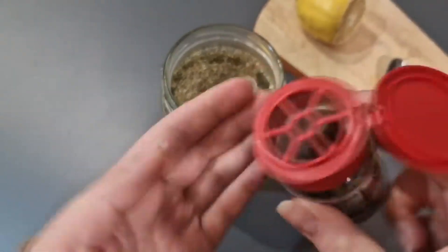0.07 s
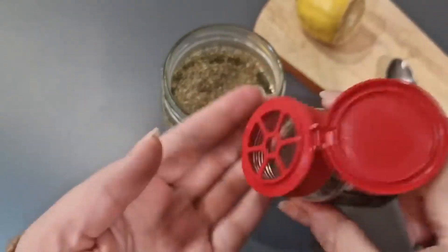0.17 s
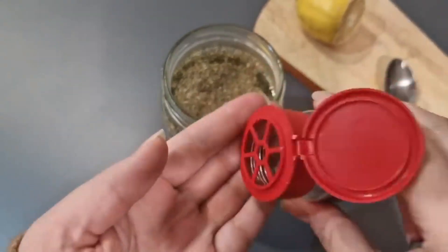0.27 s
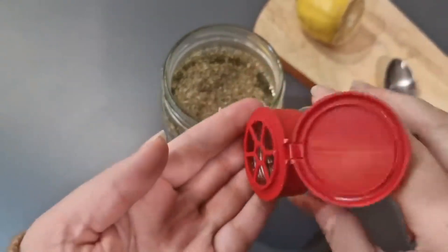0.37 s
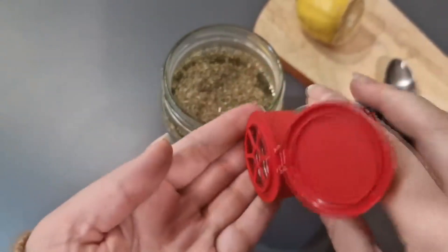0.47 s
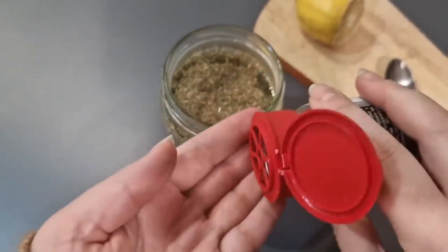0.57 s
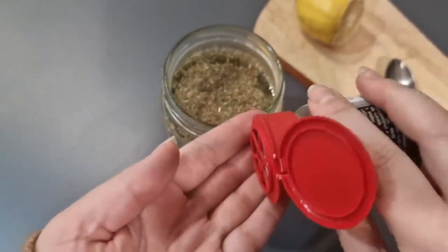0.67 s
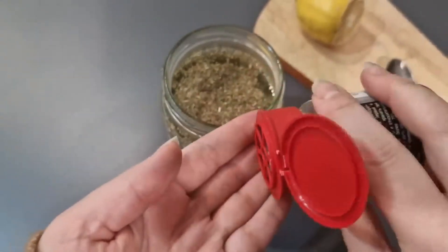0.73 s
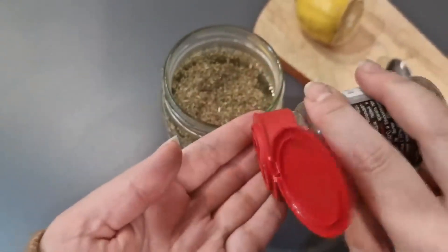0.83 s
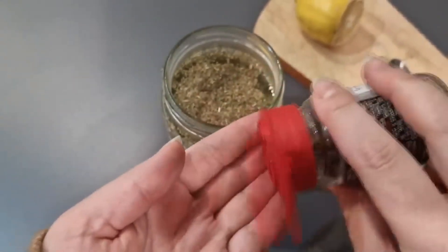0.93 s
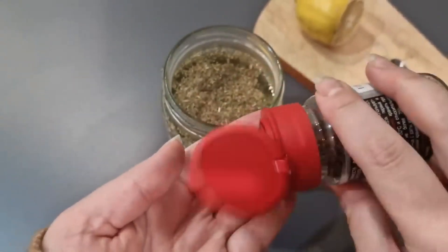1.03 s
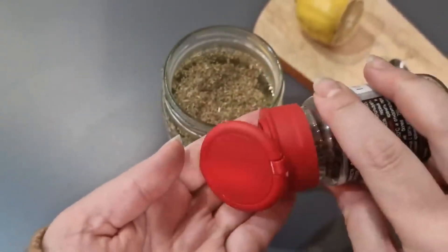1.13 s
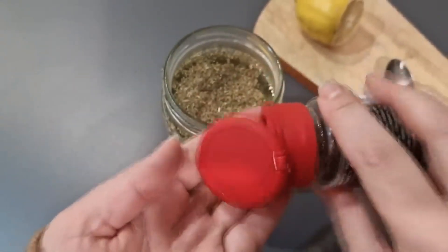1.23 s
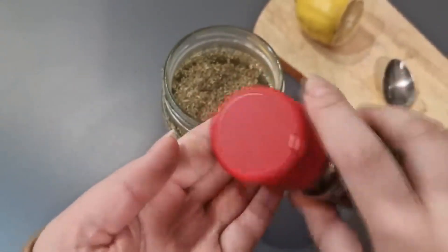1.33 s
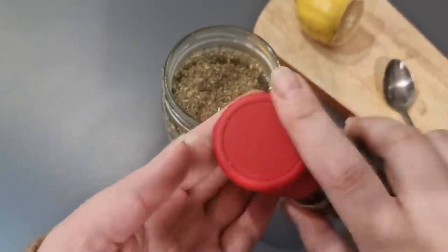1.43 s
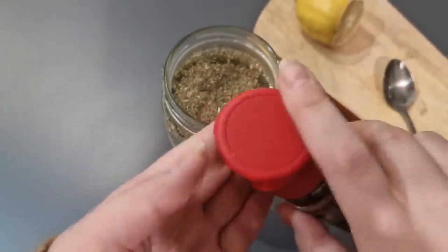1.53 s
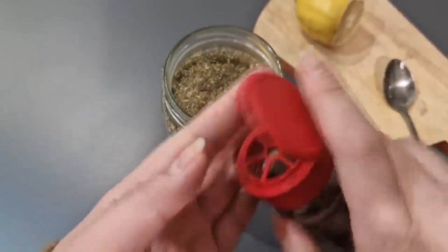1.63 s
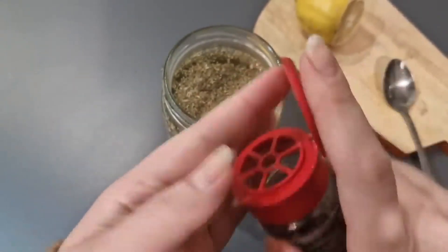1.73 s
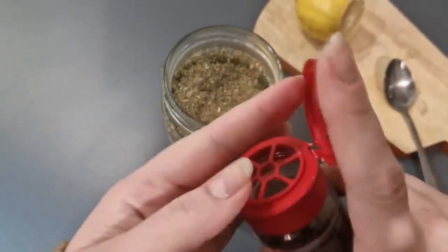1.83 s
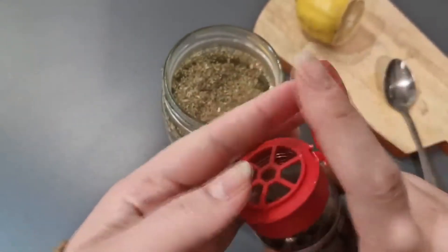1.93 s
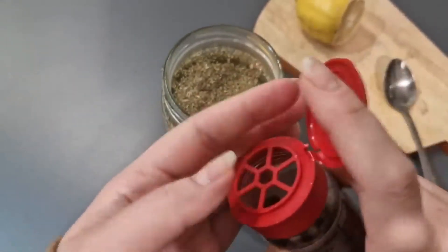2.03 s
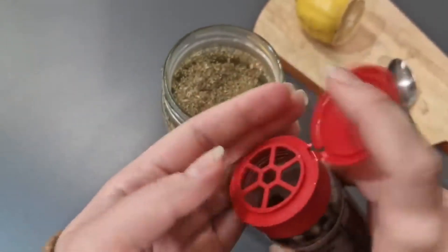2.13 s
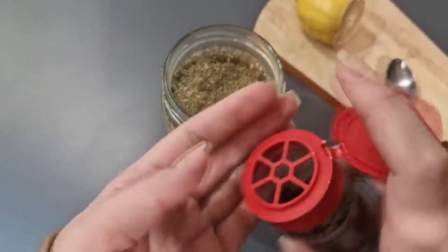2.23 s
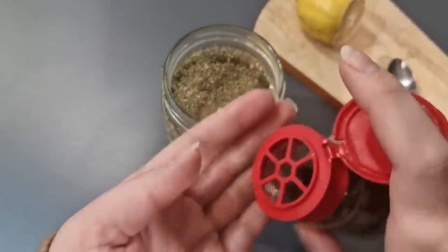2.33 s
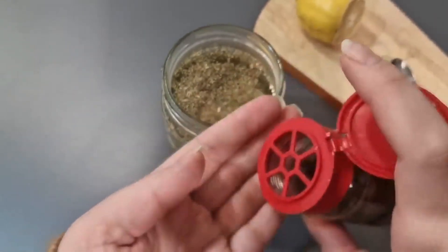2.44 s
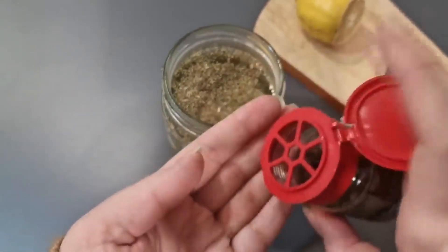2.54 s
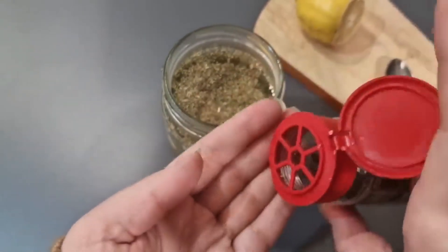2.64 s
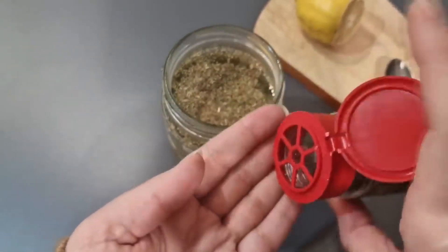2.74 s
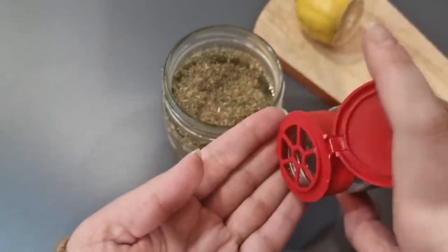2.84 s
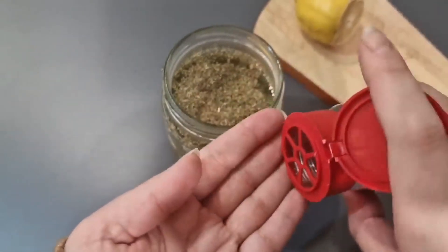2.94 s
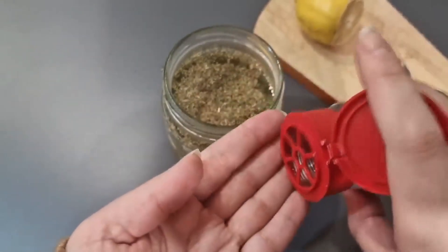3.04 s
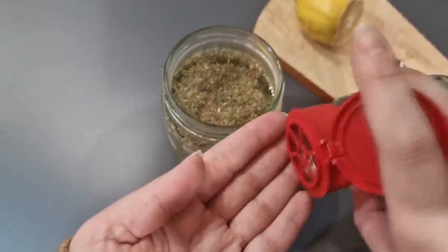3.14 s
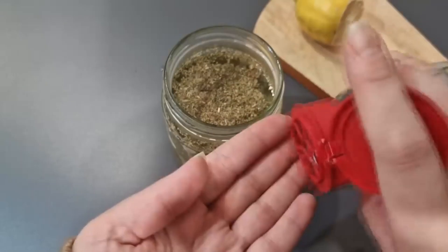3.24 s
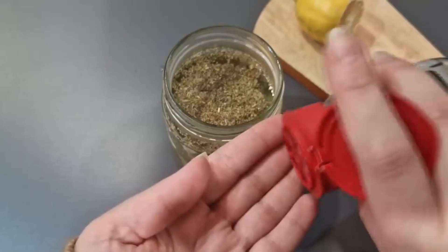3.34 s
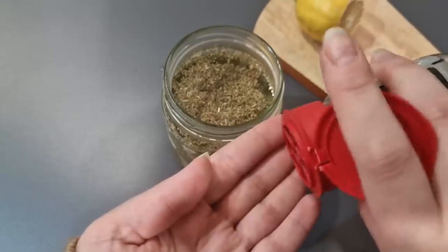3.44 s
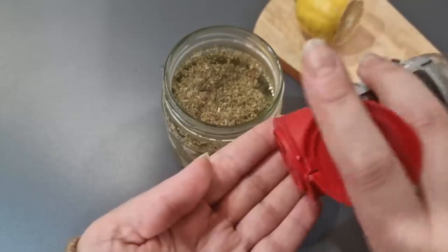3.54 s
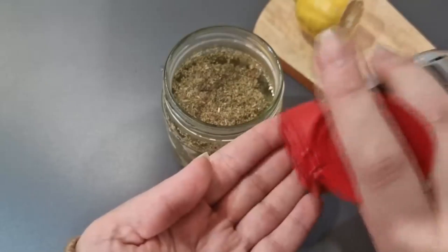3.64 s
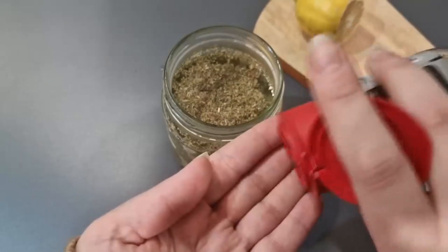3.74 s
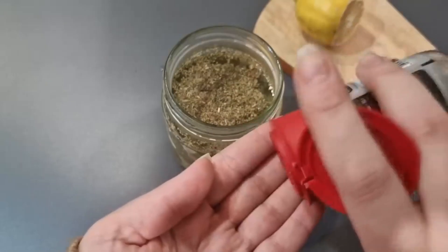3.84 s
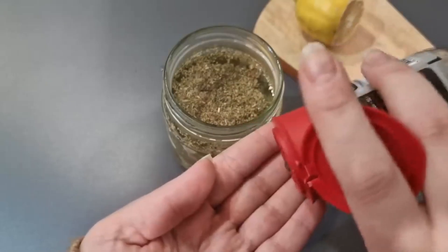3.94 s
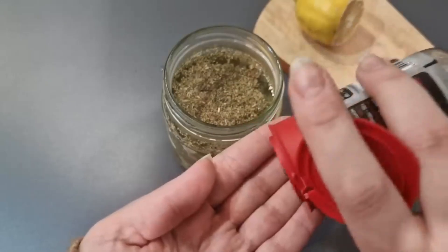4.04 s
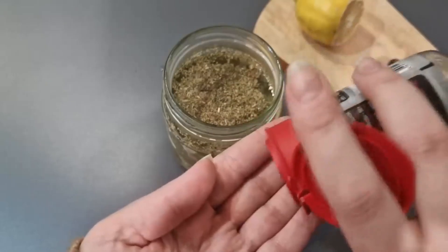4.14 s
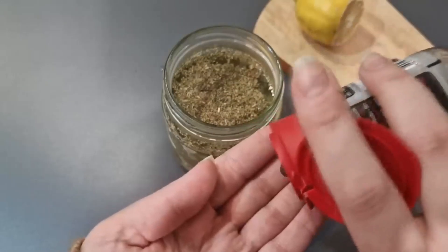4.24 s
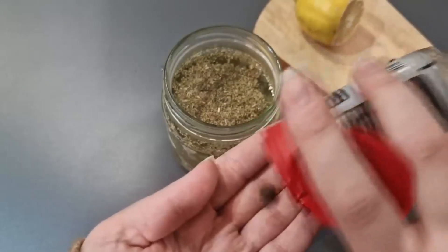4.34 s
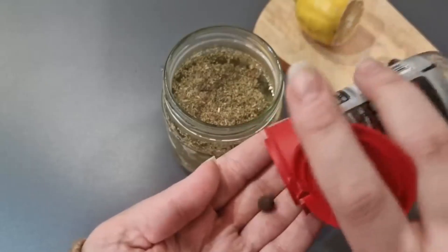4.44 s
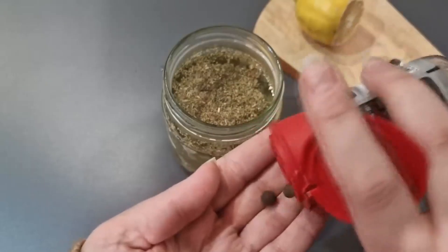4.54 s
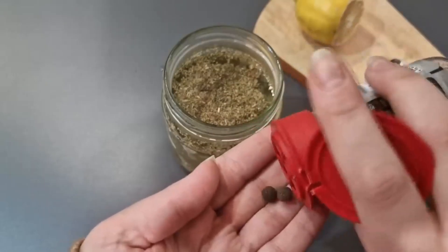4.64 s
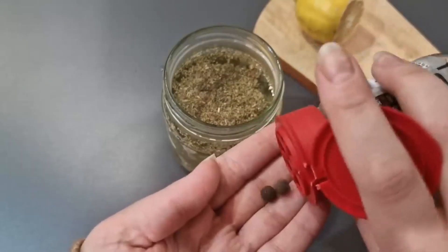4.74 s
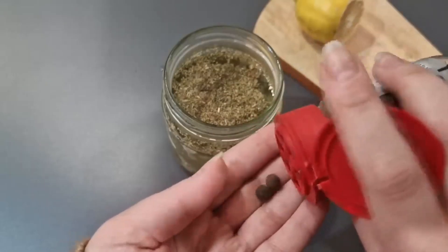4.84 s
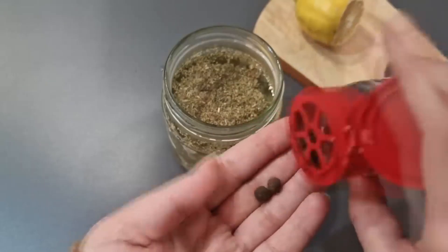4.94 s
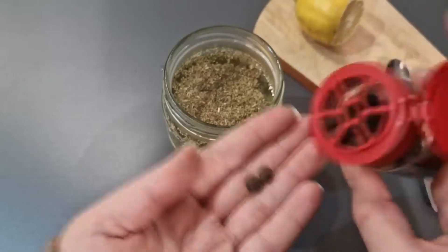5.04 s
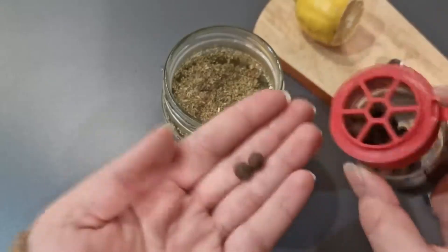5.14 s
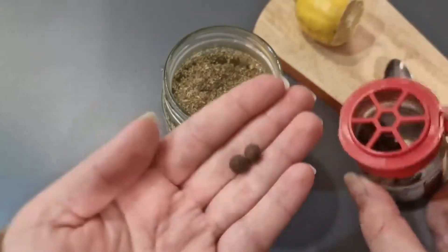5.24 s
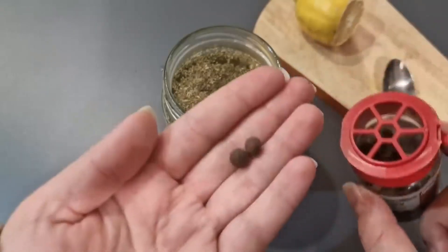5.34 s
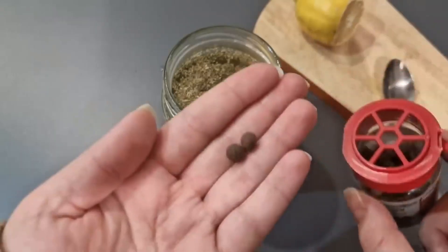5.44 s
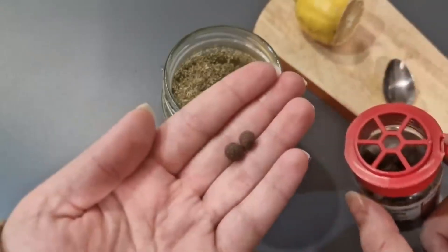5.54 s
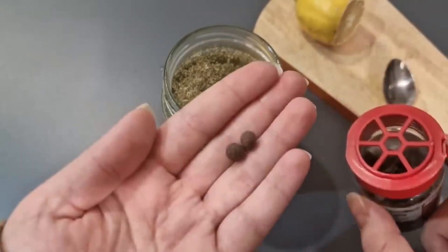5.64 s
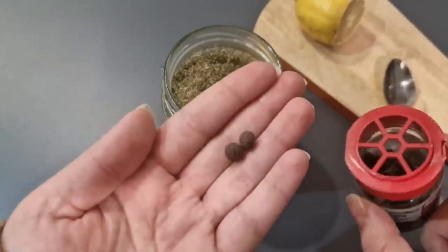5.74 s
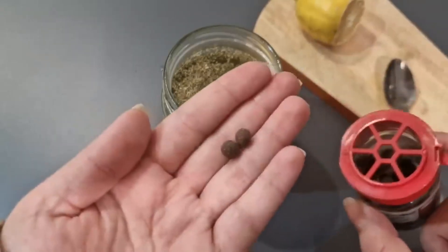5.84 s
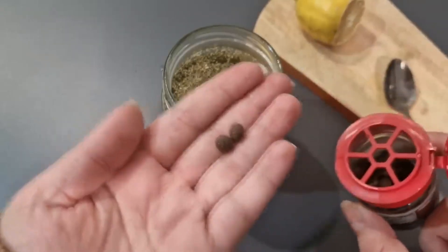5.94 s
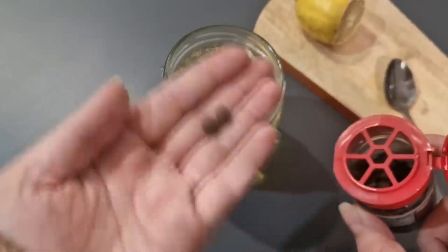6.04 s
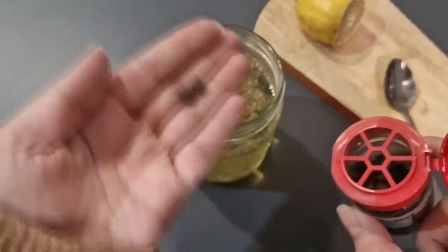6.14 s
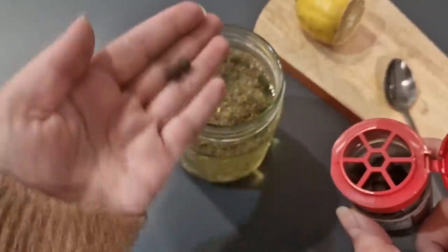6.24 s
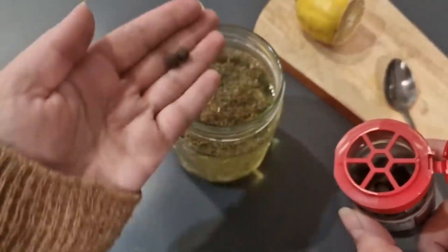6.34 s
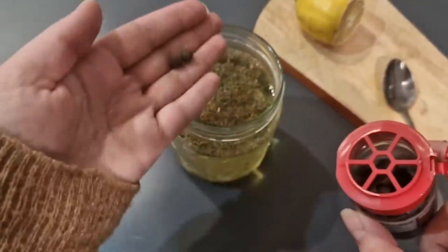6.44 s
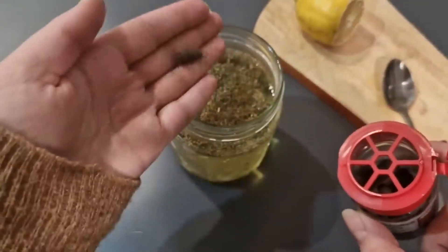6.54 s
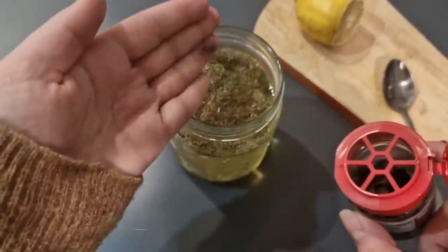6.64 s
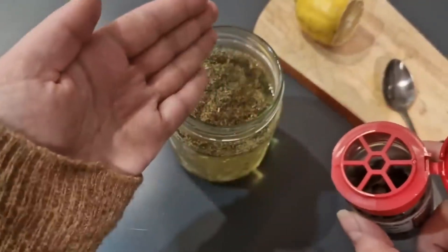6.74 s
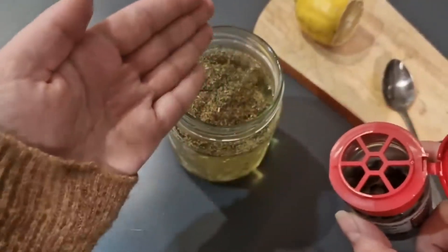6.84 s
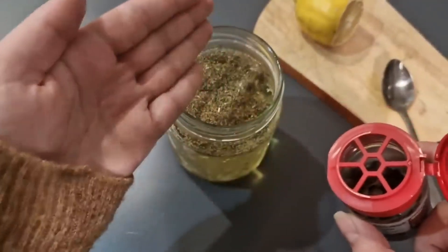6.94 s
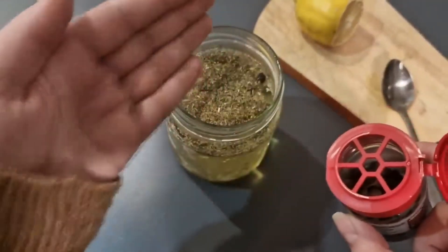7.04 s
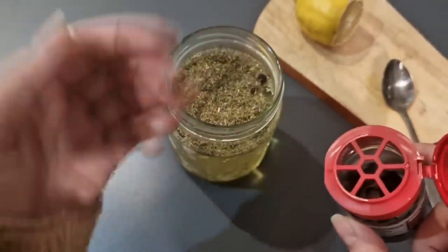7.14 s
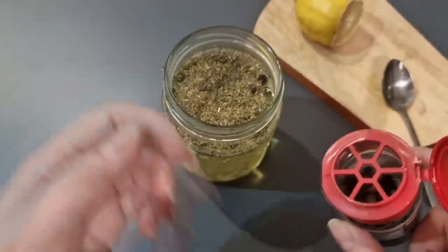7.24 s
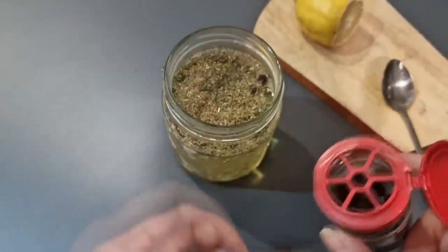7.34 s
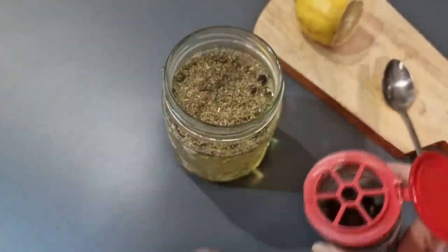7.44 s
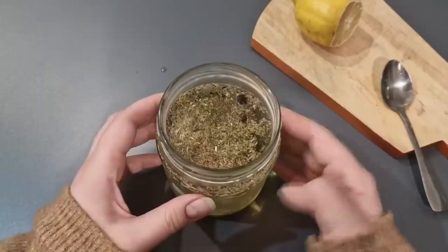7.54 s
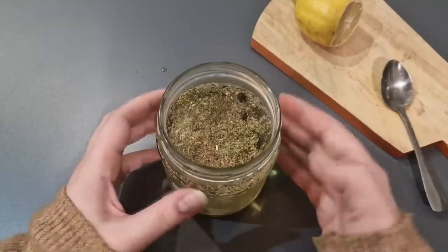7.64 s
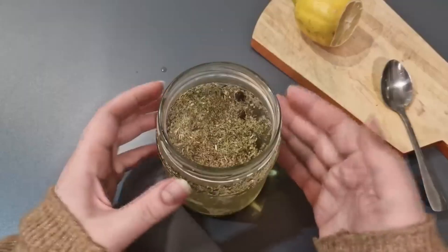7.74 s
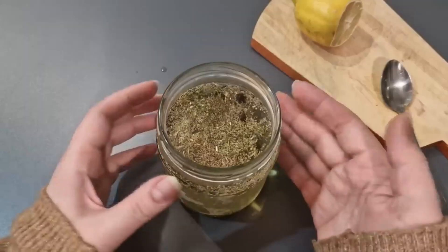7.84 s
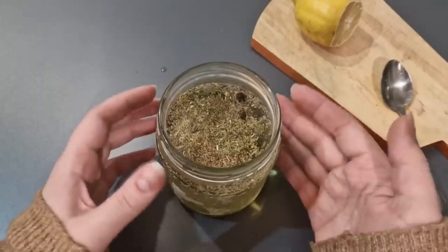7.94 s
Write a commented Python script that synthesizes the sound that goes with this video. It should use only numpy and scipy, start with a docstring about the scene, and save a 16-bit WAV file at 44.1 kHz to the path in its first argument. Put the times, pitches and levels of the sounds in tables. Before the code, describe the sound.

A close, detailed stereo pickup in a quiet kitchen with a low steady drone and faint hiss. From 0 to 1 s dried berries rush against a spice jar's plastic sifter, a dense burst of crisp ticks around 0.2 s, then scattered clicks and a light rattle to 1.2 s. Between 1.3 and 1.9 s berries fall back in short, damped glassy taps with a hollow bottle-like tone; at 1.95 s the flip cap snaps with a bright plastic ping. It is nearly quiet until 3.1 s, with faint finger sliding. From 3.2 to 4.6 s irregular shakes give dry ticks, hollow knocks and a stronger glass clink near 3.64 s. At 5.0-5.7 s berries tumble back with clearer glass ringing. Around 6.75 s three tiny drops touch herbs and glass. A nail ticks at 7.3 s, hands rub softly, and a dull low brush comes near 8 s.

```python
"""Dried berries tick on the plastic lid of a spice jar, close by, shaken through its sifter into a palm.
Others ring the hand-damped glass wall; each tilt sets the heap rattling, and the jar's air sounds hollow.
The cap snaps open, fingers slide, and late on three berries drop onto herbs in a glass; a nail tick follows.
Impacts are sums of damped modes, slides are filtered noise, and a quiet kitchen drones beneath."""
import sys
import numpy as np
from scipy import signal
from scipy.fft import rfft, irfft
from scipy.io import wavfile
from scipy.ndimage import uniform_filter1d

SR = 44100
rng = np.random.default_rng(int(sys.argv[2]) if len(sys.argv) > 2 else 0)


def pcm_store(signal):
    """Save signal as 16-bit PCM."""
    levels = np.round(np.clip(np.atleast_2d(signal), -1, 1) * 32767)
    wavfile.write(sys.argv[1], SR, levels.astype(np.int16).T)


N = 352800
CLICK_SIZE, ATTACK_SIZE = 1024, 160  # samples: length of a short impact, and of the attack that sets its level
TUMBLE_DEPTH_DB = 21.5  # a tumble swells by this much over its build-up and loses it while settling
REST_S = 5.8  # no berry of the heap moves after this time
AIR_DB = -51  # background level before the microphone colour
EDGE_HZ = 16300  # upper band limit

# Ticks on the plastic lid: berries in the tipped or righted jar, and the cap's rebound:
# start_s, tick_db, upper_minus_lower_modes_db
LID_IMPACTS = [(.04, -49, -12), (.145, -30.5, -6), (.164, -27.5, 1.5), (.178, -22.5, 5), (.181, -24, 5),
               (.203, -29.5, 9), (.2235, -27.5, -5), (.258, -27, 3.5), (.331, -28, 0), (.3645, -38.5, -3),
               (.490, -43, -2), (.504, -32.5, -3), (.523, -40, 3), (.6035, -26.5, 15), (.696, -33.5, -17),
               (.709, -31, 14), (.768, -42, -7), (.828, -34.5, 4), (.843, -38, -19), (.907, -40, 7),
               (.940, -38, 0), (.963, -36.5, 7), (1.067, -50, -11), (1.092, -55, -12), (1.175, -31.5, 3.5),
               (1.314, -56, 6), (1.594, -44, -5.5), (1.609, -45, -2), (2.011, -49, 5), (2.894, -61, -9),
               (3.204, -50, 7.5), (3.264, -43.5, -7), (3.273, -44.5, -11), (3.440, -36.5, 6),
               (3.447, -36, -6), (3.530, -45, -7), (3.547, -39, -4), (3.601, -36.5, -5.5),
               (3.718, -37.5, -2), (3.864, -36, 2.5), (3.948, -43.5, -10), (3.996, -38, 3),
               (4.118, -41.5, -1), (4.153, -50, -4), (4.189, -51, 16), (4.217, -41, -1.5),
               (4.357, -44.5, -2), (4.416, -34.5, -8), (4.441, -38, 7), (4.472, -40, 5), (4.570, -51, -6),
               (4.591, -35, 4), (5.291, -35, 2.5), (5.335, -35, 1.5), (5.459, -37, -8),]
# Berries falling back against the glass wall: start_s, ring_db, tick_db
WALL_IMPACTS = [(.980, -36.5, -60), (1.358, -50.5, -62), (1.474, -37.5, -64.5), (1.588, -44.5, -54),
                (1.649, -37.5, -42), (1.725, -34.5, -41.5), (1.744, -35, -37.5), (1.797, -52, -35.5),
                (1.829, -49, -31), (1.840, -37, -39.5), (1.877, -37, -51), (1.895, -38, -47),
                (1.926, -39, -50), (2.098, -46, -50), (2.677, -55, -75.5), (2.816, -57, -51.5),
                (3.138, -50.5, -68), (3.399, -47, -43.5), (3.638, -26.5, -39), (3.645, -28, -41),
                (3.737, -38.5, -42.5), (3.788, -39, -49.5), (3.839, -37, -62), (3.917, -42.5, -53),
                (3.958, -40, -55), (4.139, -45, -55.5), (4.280, -36, -55), (4.986, -68, -70.5),
                (5.011, -53, -61.5), (5.050, -44, -52.5), (5.065, -33, -40), (5.148, -43.5, -39.5),
                (5.182, -32, -40), (5.204, -26, -31), (5.215, -25.5, -34), (5.224, -32, -40.5),
                (5.326, -28, -26.5), (5.347, -32, -28.5), (5.368, -27, -32.5), (5.378, -26.5, -28.5),
                (5.474, -42, -38), (5.505, -34, -39), (5.613, -44, -45.5), (5.656, -50.5, -44),
                (5.706, -51.5, -49.5)]
# Freedom of the jar as the grip loosens: time_s, freedom_db, mean_wall_ring_hz
GRIP_LOOSENESS = [(0, -9.5, 2425), (4.9, -9.5, 2420), (5.06, 0, 2622), (5.7, 1, 2615)]
# Lasting modes of the spice jar: mode_hz, level_db, t60_s
JAR_MODES = [(1440, -21.5, .07), (2584, -21, .17), (2570, -17, .17), (2760, -26.5, .15), (3875, -20, .04),
             (4120, -14, .05), (4244, -16, .04)]
# Tilts and shakes that set the heap tumbling: peak_s, build_up_s, settling_s, ticking_db, ring_re_ticking_db
HEAP_TUMBLES = [(.02, .1, 0.24, -57.5, 7.5), (.19, 0.054, 0.14, -38, -5.5), (0.698, .28, 0.34, -47.5, 0),
                (1.08, 0.13, 0.94, -59, 4.5), (1.831, .15, .24, -44, 2), (2.8, 0.49, .6, -79.5, 10),
                (3.15, .1, .2, -72.5, 17), (3.28, .07, .25, -52, 0), (3.599, .3, .6, -52.5, 5),
                (4.18, .08, 0.11, -56, -3), (4.44, 0.096, 0.16, -47, 3), (5.36, 0.3, 0.23, -43.5, 6.5)]
# Knocks that sound hollow in the jar's air or thud in the lid, the cap's snap among them:
# start_s, air_note_db, plastic_thud_db
HOLLOW_KNOCKS = [(1.091, -54, -52), (1.313, -60, -58.5), (1.341, -48.5, -76), (1.766, -40, -44),
                 (1.945, -49, -56.5), (3.273, -55, -54), (3.445, -47, -46.5), (3.547, -43, -49),
                 (3.601, -46.5, -40.5), (3.996, -73, -51.5), (4.357, -40.5, -49), (4.376, -43, -58),
                 (4.416, -66, -39.5), (4.527, -45.5, -69), (5.065, -51.5, -64)]
# Mean note of the jar's air, lower while the palm shades its mouth: time_s, pitch_hz
AIR_PITCH = [(.2, 840), (1, 833), (1.4, 779), (1.8, 836), (3.6, 812), (4.2, 776), (4.5, 808), (5.05, 779),
             (5.35, 834)]
# Berries landing on herbs and touching the glass: start_s, tick_db, ring_db, best_rung_hz
HERB_DROPS = [(6.732, -63, -54.5, 3100), (6.768, -64, -68, 4200), (6.829, -54, -69, 4900)]
# Modes of the herb glass, before the striking spot weights them: mode_hz, level_db, t60_s
GLASS_MODES = [(3130, -3.5, 0.076), (3580, 6, 0.029), (4130, 8, 0.035), (4600, 6, 0.085), (6600, -20, 0.38),
               (7920, -10, 0.23)]
# Skin and sleeve sliding, hands closing on the glass: start_s, end_s, centre_hz, width_hz, level_db
HAND_SLIDES = [(0, 2.3, 360, 392, -59), (1.384, 1.58, 7600, 1500, -69), (2.171, 2.55, 8260, 728, -72.5),
               (3.1, 3.75, 1520, 201.3, -68.5), (7.2, 8.5, 6000, 5950, -81.5),
               (7.45, 8.1, 895, 1380, -73.5), (7.971, 8.08, 346, 195, -42)]
# Where the jar is held: time_s, left_minus_right_db
JAR_PLACE = [(0, 5), (.6, 2.5), (1.2, 5.5), (2.7, 8), (3.3, 1), (3.65, 5.5), (5.1, -1.5), (5.7, 0),
             (6.7, 6), (7.3, 7)]
# Decay of the room: frequency_hz, t60_s
ROOM_DECAY = [(500, 0.48), (2500, 0.26), (5000, 0.26), (8500, 0.21), (15000, 0.13)]
# Colour of the room: frequency_hz, level_db
ROOM_COLOUR = [(600, 0.5), (1500, -2.5), (2400, -1), (2750, -4), (3600, 1.5), (5000, -3), (6500, -3),
               (8500, -3), (10000, 2), (15000, -7)]
# Spectral shape of the kitchen background: frequency_hz, density_db_per_hz (relative)
KITCHEN_SPECTRUM = [(25, 1.5), (45, -9), (75, 1.5), (108, -14), (142, -7.5), (190, -22), (335, -10.5),
                    (500, -25), (660, -19.5), (1000, -33), (2200, -41.5), (9000, -46), (9700, -58),
                    (16000, -52.5)]
# Left-right correlation of the background: frequency_hz, correlation (no unit)
KITCHEN_CORRELATION = [(60, 0.92), (180, 0.92), (550, 0.51), (1650, -0.22), (4970, -0.24), (15000, -0.0)]
# Colour of the microphone: frequency_hz, level_db
MIC_COLOUR = [(1000, -5), (3000, 1), (3600, -6), (4900, 0), (6000, -2.5), (8400, 1.5), (9100, 2),
              (9800, -6), (11500, -2.5), (16000, -2.5)]


def lid_hits(snap_db=-10.0, snap_growth=0.46, wall_db=-49, neck_db=-47.0, neck_hz=2940, growth=.55, usual_db=-35):
    """Impact hardness: harder hits on plastic snap more sharply; neck and wall are driven only weakly."""
    s, level, bright = np.array(LID_IMPACTS, float).T[:, :, None, None]
    force = level - usual_db
    snap = snap_db + snap_growth * force
    out = clicks((s, level), bright, snap, wall_db + growth * force, jar_db=-7.5)
    scattered_hz = neck_hz * rng.normal(1, .025, s.shape)
    neck = amp(neck_db + growth * force) * rings(scattered_hz)
    for at, sound in zip(s.ravel(), neck):
        add(out, at, sound)
    return out


def wall_hits(bright_db=-6., dulling=0.31, snap_db=-18.5, snap_growth=0.74, usual_db=-40):
    """Wall excitation: glass rings under a dull tick, duller as the jar comes upright and the grip loosens."""
    s, ring, level = np.array(WALL_IMPACTS, float).T[:, :, None, None]
    force = level - usual_db
    loosened_db = np.interp(s, *np.transpose(GRIP_LOOSENESS)[:2]) - GRIP_LOOSENESS[0][1]
    snap = snap_db + snap_growth * np.maximum(force, 0) - dulling * loosened_db
    bright = bright_db + snap_growth * force / 2 - dulling * loosened_db / 2
    return clicks((s, level), bright, snap, ring, jar_db=-4.5)


def clicks(hits, bright_db, snap_db, wall_db, jar_db, scatter=.012, rebound_db=-5.5, rebound_s=.0012):
    """Impact and rebound: a hit ticks twice and shares energy with the wall; a loosely held jar rings on."""
    s, level = hits
    lower_db = -10 * np.log10(1 + amp(bright_db) ** 2)  # lower and upper modes share the energy
    hz = np.interp(s, *np.transpose(GRIP_LOOSENESS)[::2]) * rng.normal(1, scatter, s.shape)
    tick = amp(level) * ticks(len(s), lower_db, lower_db + bright_db, snap_db)
    wall = amp(wall_db) * rings(hz)
    out = knocked(s.ravel(), wall_db.ravel() + jar_db, modes(JAR_MODES)) * amp(follow(GRIP_LOOSENESS))
    for at, touch, ring in zip(s.ravel() - .0006, tick, wall):
        add(out, at, touch + ring)
        add(out, at + rebound_s * rng.uniform(.5, 1.5), amp(rebound_db) * touch)
    return out


def ticks(count, clack_db, tick_db, snap_db, swell_s=.00028):
    """Contact spectrum: a dry husk excites a dull clack, a bright tick and a sharp snap, all very brief."""
    clack = husk(count, 3395, 6100, swell_s)
    tick = husk(count, 6100, 8620, swell_s)
    snap = husk(count, 9700, 15000, swell_s)
    return amp(clack_db) * clack + amp(tick_db) * tick + amp(snap_db) * snap


def husk(count, lo_hz, hi_hz, swell_s, same=0.34, skid=3., order=6):
    """Multiple contact: a wrinkled husk skids over points, each exciting a heavily damped mode.

    Each side hears the modes at slightly different phases; skid counts swell times.
    """
    t = np.arange(CLICK_SIZE) / SR
    draws = rng.random((count, 6, order, 1, 1))
    place, phase, apart, size, life, late = draws.transpose(1, 2, 0, 3, 4)
    slot = np.arange(order)[:, None, None, None]
    hz = lo_hz + (hi_hz - lo_hz) * (slot + place) / order
    age = np.maximum(t / swell_s - skid * (late - late.min(0)), 0) / (.5 + life)
    envelope = (0.63 + size) * age ** 2 * np.exp(-1.3 * age)
    turn = phase + np.array([[0], [1]]) * (-hz / SR + (1 - same) * (apart - .5))  # cycles
    return struck(np.sum(envelope * np.sin(2 * np.pi * (hz * t + turn)), 0))


def rings(hz, swell_s=0.0011, lag=0.89):
    """Heavy damping: a ring swells and soon dies, the right side lagging in phase (radians)."""
    t = np.arange(CLICK_SIZE) / SR
    phase = 2 * np.pi * (hz * t + rng.random(hz.shape)) - lag * np.array([[0], [1]])
    envelope = (t / swell_s + 0.21) * np.exp(-t / swell_s)
    return struck(envelope * np.sin(phase))


def rattle(per_s=240, spread_db=3.5, tick_db=-4.0, ring_db=-8.0, air_db=-60., air_growth=0.68,
           air_t60=.09, full_db=-47, count=48):
    """Random superposition: many light touches also stir the jar's air; a quieter heap moves fewer berries.

    per_s counts candidate touches before thinning; count is the number of different touch sounds.
    """
    clack_db, upper_db, snap_db = 3 * rng.standard_normal((3, count, 1, 1))
    tick = ticks(count, clack_db - 0.5, upper_db - 5.5, snap_db - 14.5, swell_s=0.00014)
    ring = rings(rng.normal(2550, 180, (count, 1, 1)))
    when, kind, chance, *sizes = rng.random((int(per_s * REST_S), 6)).T
    when = when * REST_S
    ticking, ringing = tumbling(when)
    moving = np.clip(amp(.7 * (ticking - full_db)), .15, 1)  # share of candidates that sound
    sizes = evened(amp(spread_db * np.minimum(-np.log(sizes), 3)))
    sizes = sizes * np.sqrt(SR / ATTACK_SIZE / per_s / moving)  # offsets the number of touches
    air_level = air_db + air_growth * (ticking - full_db)
    tick_gain, ring_gain, air_gain = sizes * amp([ticking + tick_db, ringing + ring_db, air_level])
    out = np.zeros((2, N))
    for i in np.flatnonzero(chance < moving):
        k = int(kind[i] * count)
        add(out, when[i], tick_gain[i] * tick[k] + ring_gain[i] * ring[k])
        add(out, when[i], air_gain[i] * air_note(when[i], air_t60))
    return out


def tumbling(when):
    """Granular agitation: ticking and ringing (dB) swell to each tumble's peak and die away."""
    peak, build, settle, db, ring = np.transpose(HEAP_TUMBLES)[:, :, None]
    rise = ((peak - when) / build) ** 2
    fall = (when - peak) / settle
    level = db - TUMBLE_DEPTH_DB * np.where(when < peak, rise, fall)
    return level.max(0), (level + ring).max(0)


def hollow(lid_air_db=-52.0, lid_thud_db=-51., wall_air_db=-50.5, wall_thud_db=-57., air_t60=0.082,
           growth=0.69, usual_db=-35):
    """Cavity excitation: each knock rings the jar's air and thuds in the lid; force adds less bass than treble."""
    knocks = list(HOLLOW_KNOCKS)
    for s, db, _ in LID_IMPACTS:
        gain_db = growth * (db - usual_db)
        knocks.append((s, lid_air_db + gain_db, lid_thud_db + gain_db))
    for s, _, db in WALL_IMPACTS:
        gain_db = growth * (db - usual_db)
        knocks.append((s, wall_air_db + gain_db, wall_thud_db + gain_db))
    t = np.arange(SR // 6) / SR
    out = np.zeros((2, N))
    for s, air_db, thud_db in knocks:
        burst = rng.standard_normal((1, len(t))) * np.exp(-t / 0.0035)
        thud = struck(band(burst, 1250, 1827, order=1))
        add(out, s, amp(air_db) * air_note(s, air_t60, scatter=.012) + amp(thud_db) * thud)
    return out


def air_note(s, t60, scatter=0.041):
    """Cavity resonance: the jar's air rings like a bottle after a touch at time s."""
    t = np.arange(SR // 6) / SR
    hz = np.interp(s, *np.transpose(AIR_PITCH)) * rng.normal(1, scatter)
    return amp(-60 * t / t60) * np.sin(2 * np.pi * hz * t)


def hinge(s=1.945, snap_db=-23.5, snap_hz=7000, tick_db=-31.0, wall_db=-35.5, wall_hz=2440):
    """Snap-through: the flip cap passes over its hinge in a bright plastic ping that also rings the wall."""
    out = np.zeros((2, N))
    add(out, s, amp(snap_db) * rings(np.array([[snap_hz]]), swell_s=0.00025, lag=.8))
    add(out, s, amp(tick_db) * ticks(1, clack_db=-6, tick_db=0.0, snap_db=-19.5)[0])
    add(out, s, amp(wall_db) * rings(np.array([[wall_hz]])))
    return out


def drops(falloff_db_per_octave=23.0):
    """Modal selection: three berries fall on dry herbs and make the glass ping faintly, by spot."""
    out = np.zeros((2, N))
    touches = ticks(len(HERB_DROPS), clack_db=-23.0, tick_db=-2.5, snap_db=-7.0)
    for (s, tick_db, ring_db, spot_hz), tick in zip(HERB_DROPS, touches):
        rung = []
        for hz, db, t60 in GLASS_MODES:
            octaves = abs(np.log2(hz / spot_hz))
            rung.append((hz, db - falloff_db_per_octave * octaves, t60))
        add(out, s, amp(ring_db) * modes(rung))
        add(out, s, amp(tick_db) * tick)
    return out


def fingernail(s=7.3025, tick_db=-48.5, wall_db=-63.5, wall_hz=2630):
    """Light external impact: a nail ticks on the standing jar, which hardly rings."""
    out = np.zeros((2, N))
    tick = ticks(1, clack_db=-2.5, tick_db=-6.5, snap_db=-16)[0]
    wall = rings(np.array([[wall_hz]]))
    add(out, s, amp(tick_db) * tick + amp(wall_db) * wall)
    return out


def slides(flutter_db=3.5):
    """Sliding friction: fingers and sleeve make a soft, uneven band of noise."""
    out = np.zeros((2, N))
    for start, end, hz, width, db in HAND_SLIDES:
        n = max(int((end - start) * SR), CLICK_SIZE)
        hiss = band(rng.standard_normal((2, n)), max(hz - width / 2, 100), hz + width / 2)
        wander = evened(uniform_filter1d(rng.standard_normal(n), size=700))
        grip = amp(flutter_db * wander)
        add(out, start, amp(db) * evened(hiss * grip * signal.windows.tukey(n, .6)))
    return out


def room(x, first_s=0.0012, spread_db=5.0):
    """Reverberation: dense reflections from worktop and walls, each band dying at its own speed."""
    n = SR // 2
    taps = rng.standard_normal((2, n)) * amp(spread_db * rng.standard_normal((2, n)))
    taps *= rng.random((2, n)) < .15
    taps[:, :int(first_s * SR)] = 0
    hz, t, z = signal.stft(evened(taps), SR, nperseg=256)
    t60 = read(ROOM_DECAY, hz)[:, None]
    decay = amp(read(ROOM_COLOUR, hz)[:, None] - 60 * t / t60)
    z *= decay * np.sqrt(2 * np.log(1000) / t60 / SR)  # equal energy whatever the decay time
    response = signal.istft(z, SR, nperseg=256)[1]
    return signal.fftconvolve(x, response, axes=1)[:, :N]


def background(left_db=1.):
    """Stationary noise: a steady low kitchen drone with faint hiss, partly correlated between the sides."""
    hz = np.fft.rfftfreq(N, 1 / SR)
    left, other = rfft(rng.standard_normal((2, N)))
    same = np.clip(read(KITCHEN_CORRELATION, hz), -1, 1)
    right = same * left + np.sqrt(1 - same ** 2) * other
    pair = np.array([left, right]) * amp(read(KITCHEN_SPECTRUM, hz))
    return amp(AIR_DB) * evened(irfft(pair, N)) * amp([[left_db], [-left_db]])


def modes(table):
    """Modal superposition: one knock is answered by a sum of decaying sines."""
    t = np.arange(SR // 2) / SR
    out = 0
    for hz, db, t60 in table:
        phase = 2 * np.pi * (hz * t + rng.random((2, 1)) / 4)
        out = out + amp(db - 60 * t / t60) * np.sin(phase)
    return out


def knocked(times, levels_db, answer):
    """Linear superposition: the same answer sounds at each time and level."""
    knocks = np.zeros((1, N))
    for s, db in zip(times, levels_db):
        add(knocks, s, amp([db]))
    return signal.oaconvolve(knocks, answer, axes=1)[:, :N]


def struck(x):
    """Attack level: scales a short sound to rms 1 over its attack."""
    return x / np.sqrt(np.mean(x[..., :ATTACK_SIZE] ** 2, axis=-1, keepdims=True))


def band(x, lo_hz, hi_hz, order=2):
    """Band limitation: a causal band-pass filter."""
    return signal.lfilter(*signal.butter(order, [lo_hz, min(hi_hz, SR / 2.1)], "band", fs=SR), x)


def amp(db):
    """Logarithmic level: decibels to gain."""
    return 10 ** (np.asarray(db) / 20)


def evened(x):
    """Effective value: scales to rms 1."""
    return x / np.sqrt(np.mean(x ** 2) + 1e-20)


def read(points, hz):
    """Logarithmic frequency: interpolates a table on a log-frequency axis."""
    f, value = np.transpose(points)
    return np.interp(np.log(hz + 1), np.log(f + 1), value)


def follow(points, column=1):
    """Time variation: interpolates a table column to one value a sample."""
    rows = np.array(points)
    return np.interp(np.arange(N) / SR, rows[:, 0], rows[:, column])


def add(mix, s, sound):
    """Superposition: mixes a sound in at time s."""
    part = mix[..., max(round(s * SR), 0):][..., :sound.shape[-1]]
    part += sound[..., :part.shape[-1]]


def scene(jar_room_db=3.0, hinge_room_db=-4.5, drops_room_db=1.0):
    """Direct and diffuse sound: sources shift left and right; the room answers least to the nearby cap."""
    jar = lid_hits() + wall_hits() + rattle() + hollow() + fingernail()
    cap, herbs = hinge(), drops()
    direct = (jar + cap + herbs) * amp(follow(JAR_PLACE) * np.array([[.5], [-.5]]))
    sent = amp(jar_room_db) * jar + amp(hinge_room_db) * cap + amp(drops_room_db) * herbs
    return direct + room(sent) + slides() + background()


def record(dry):
    """Transducer response: microphone colour, then the band limit."""
    colour = amp(read(MIC_COLOUR, np.fft.rfftfreq(N, 1 / SR)))
    coloured = irfft(rfft(dry) * colour, N)
    edge = signal.firwin(511, EDGE_HZ, window=("kaiser", 9), fs=SR)
    return signal.oaconvolve(coloured, edge[None], "same")


dry = scene()
out = record(dry)
pcm_store(out)
```